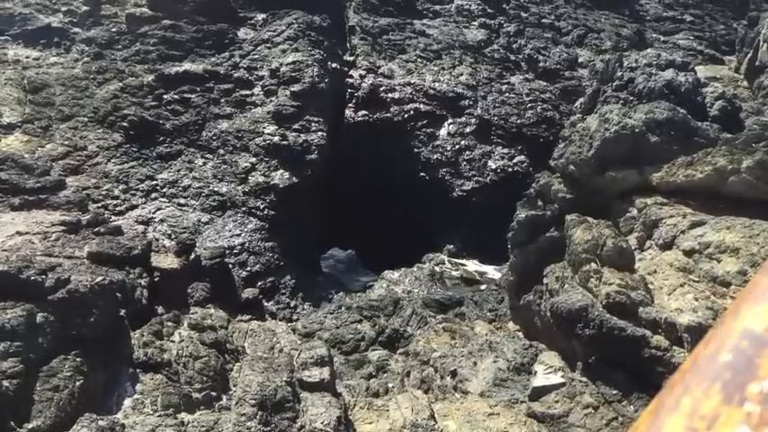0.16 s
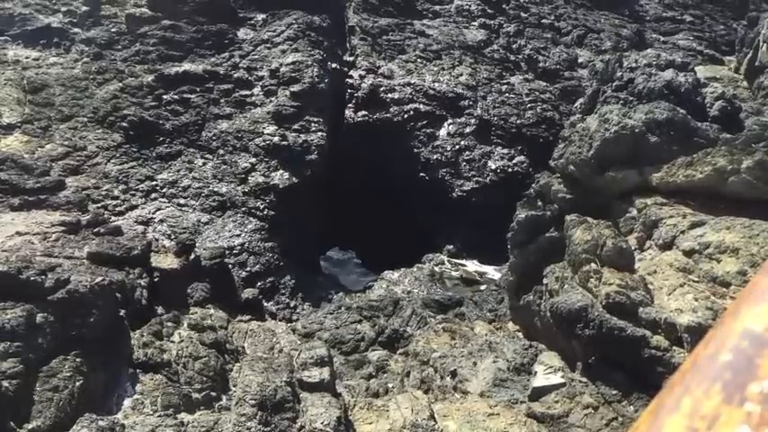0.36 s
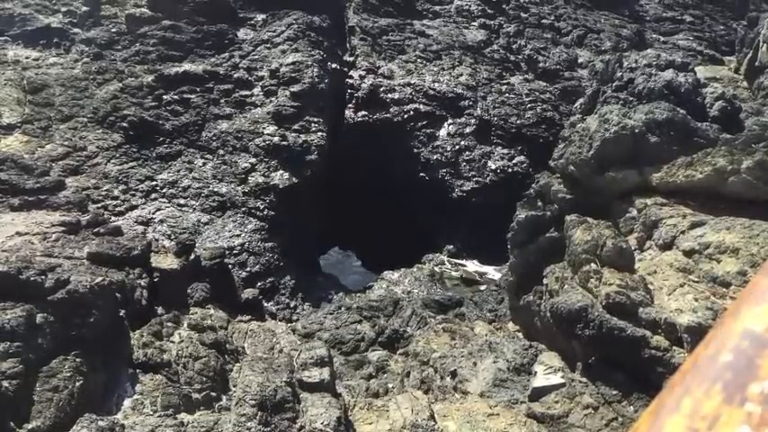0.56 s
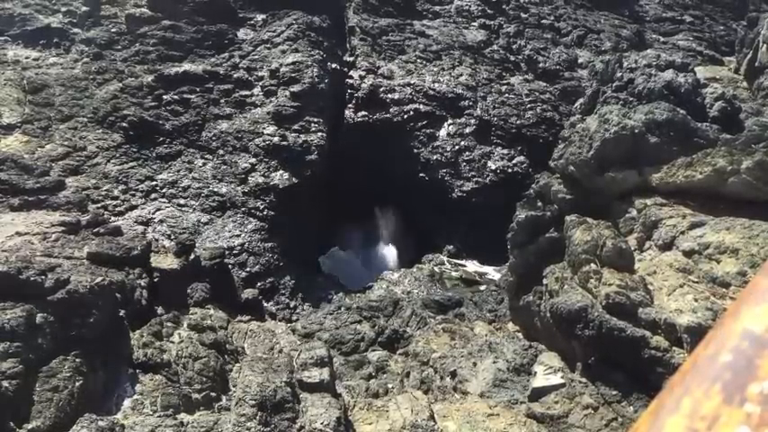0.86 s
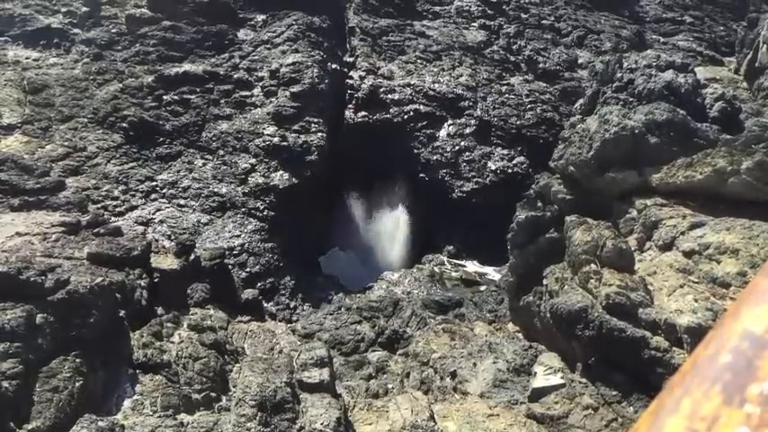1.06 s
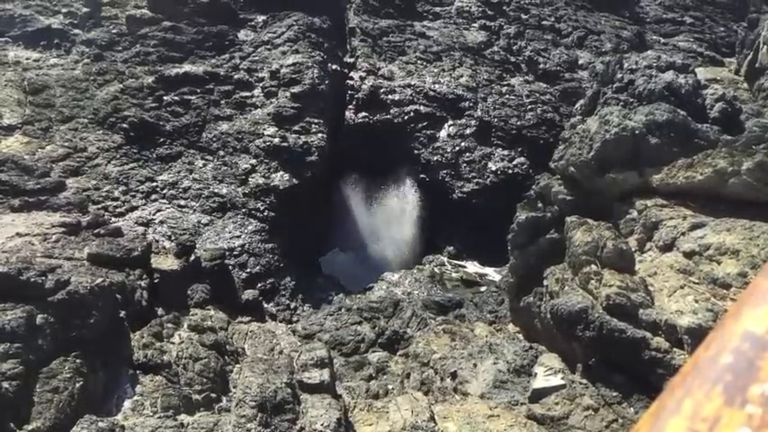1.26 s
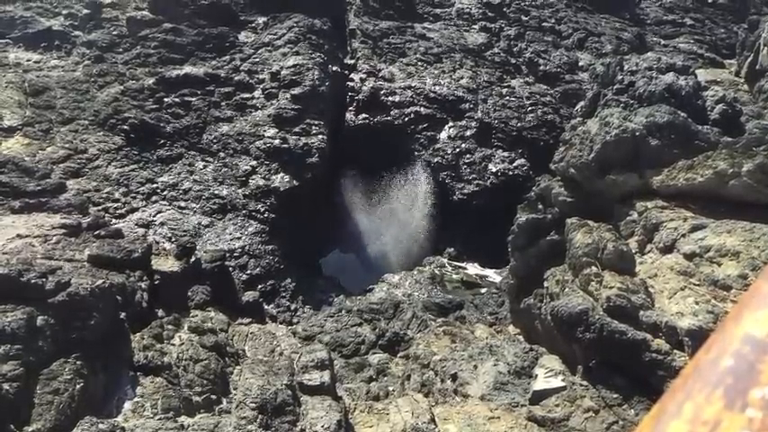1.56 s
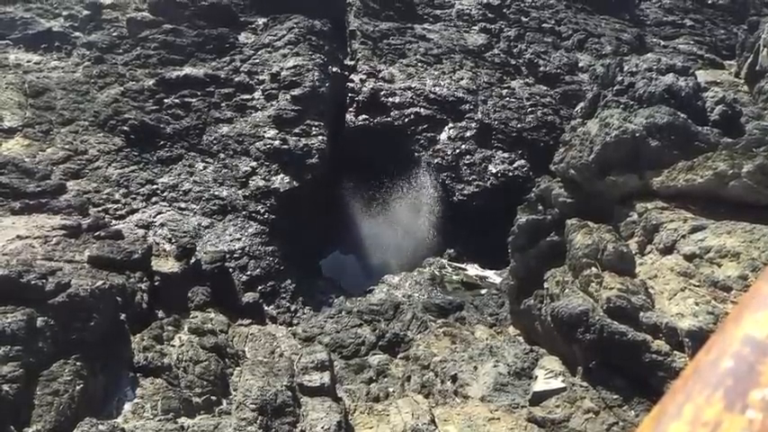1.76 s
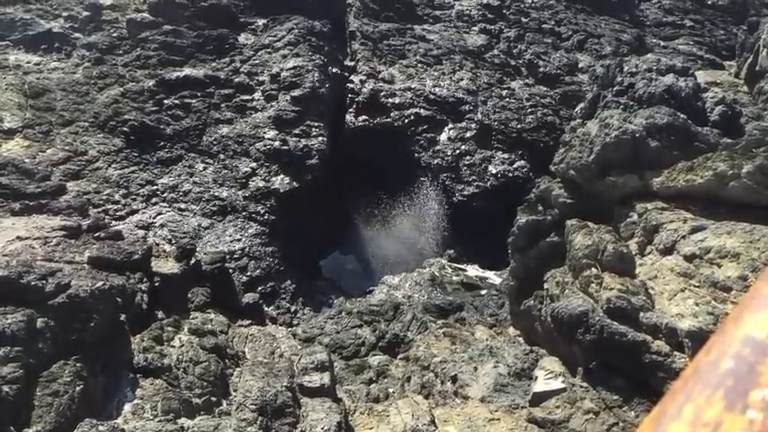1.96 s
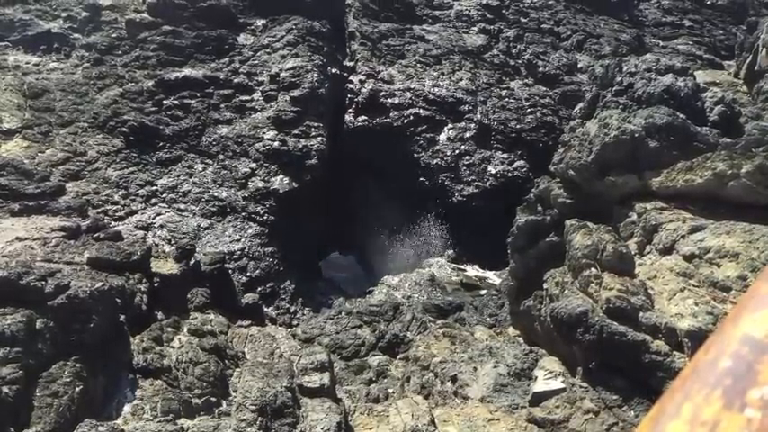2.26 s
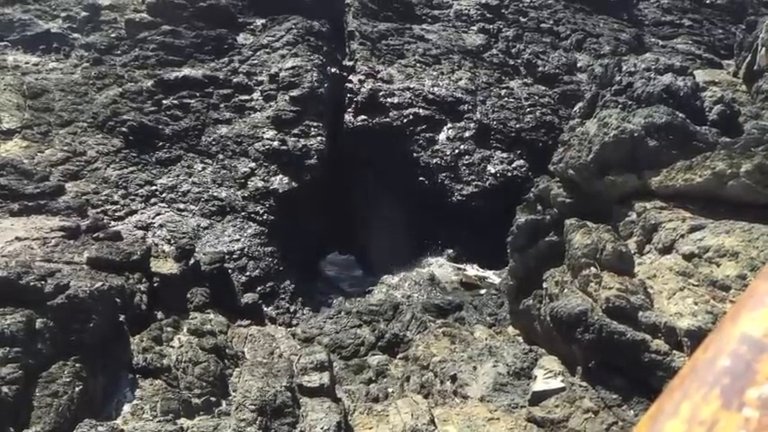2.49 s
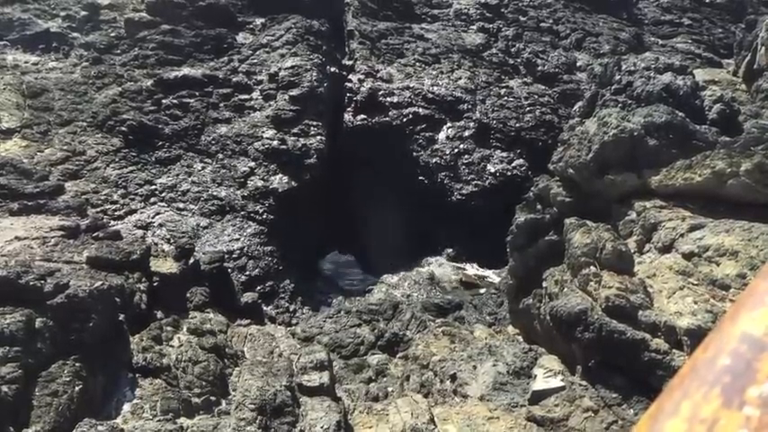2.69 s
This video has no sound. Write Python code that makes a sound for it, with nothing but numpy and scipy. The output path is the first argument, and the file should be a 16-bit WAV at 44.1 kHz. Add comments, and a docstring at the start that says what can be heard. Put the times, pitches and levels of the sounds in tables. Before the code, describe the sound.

A blowhole on a rocky shore: low wind rumble and rapid buffets hit the microphone, strongest in the first 0.4 s, over faint steady surf. Two hollow rushes of water and air peak near 0.3 and 0.6 s, trailing a thin hiss until about 1.1 s. After a lull, spray splatters on rock from 1.4 s, densest at 1.6-2 s, with small plinks and sizzling mist, fading by 2.8 s as wind swells again.

```python
"""A blowhole in a rocky shore. Wind buffets the microphone in short low flutters (banded noise) over
a steady wash of surf (flickering octaves of noise). Two surges of air and water rush through the cavity
with droplets and foam; a thin jet hiss follows. Then the plume's spray patters back on the rock: heavy
drops first, then fine mist (sparse impacts), with droplets plinking into pools (decaying sines)."""
import sys
import numpy as np
from scipy import signal
from scipy.fft import rfft, irfft, next_fast_len
from scipy.io import wavfile
from scipy.ndimage import uniform_filter1d

SR = 44100
rng = np.random.default_rng(int(sys.argv[2]) if len(sys.argv) > 2 else 0)


def master_out(mix):
    """Clip the mix to full scale and print it as 16-bit PCM to the path in sys.argv[1]."""
    frames = np.transpose(np.atleast_2d(mix))
    ceiling = np.clip(frames, -1, 1)
    pcm = np.round(ceiling * 32767).astype(np.int16)
    wavfile.write(sys.argv[1], SR, pcm)


N = 124803

HEAVY_DROPS_PER_S, FINE_DROPS_PER_S = 2800, 12000
DROP_SPREAD_DB = 1
PLINKS_PER_S, PLINK_HZ, PLINK_SPREAD_OCTAVES = 600, 2408, 0.348
PLINK_DECAY_CYCLES, PLINK_SPREAD_DB = 5.6, 1.5
SPLASH_GRAINS_PER_S, SPLASH_DB = 600, -7.5  # droplets thrown by a surge; level against its rush
FOAM_LAG_S, FOAM_RISE_S, FOAM_FALL_S = 0.0067, 0.11, 0.13  # hiss torn from each surge
SURF_DB = -41
FLUTTER_DB = 2  # random unsteadiness of the rumble
BUFFET_ATTACK_S, BUFFET_RELEASE_S, EDGE_STEEPNESS = 0.0016, 0.0055, 4.5
EDDY_SKEW = 0.18  # pressure grows with the square of air speed: crests sharper than troughs
RUMBLE_CUT_HZ, WIND_CEILING_HZ = 39, 746
TOP_HZ = 15350


def undb(db):
    """Decibels to gain."""
    return 10 ** (np.asarray(db) / 20)


def unit(x):
    """Scale to rms 1."""
    return x / np.sqrt(np.mean(x ** 2))


def curve(points):
    """Gain over time from (time [s], level [dB]) points."""
    return undb(np.interp(np.arange(N) / SR, *np.array(points).T))


def bin_hz(size):
    """FFT bin frequencies, at least 1 Hz to keep logs and ratios finite."""
    return np.maximum(np.fft.rfftfreq(size, 1 / SR), 1)


def colour(x, points):
    """Filter by (frequency [Hz], gain [dB]) points joined on a log-frequency axis."""
    hz, db = np.array(points).T
    gain_db = np.interp(np.log(bin_hz(len(x))), np.log(hz), db)
    return irfft(rfft(x) * undb(gain_db), len(x))


def shaped(x, points):
    """A long excitation, coloured, cut to the scene's length, at rms 1."""
    return unit(colour(x, points)[:N])


def noise():
    """White noise of a fast FFT length, at least the scene's."""
    return rng.standard_normal(next_fast_len(N, True))


def walk(rate_hz):
    """Smooth random drift of rms 1: noise under a Gaussian low-pass of width rate_hz."""
    white = noise()
    hz = np.fft.rfftfreq(len(white), 1 / SR)
    return unit(irfft(rfft(white) * np.exp(-(hz / rate_hz) ** 2), len(white)))


def eddies(x, span_s):
    """Even out the strength of a random flutter over span_s, so that one eddy follows the next."""
    size = max(int(span_s * SR), 2)
    power = uniform_filter1d(uniform_filter1d(x ** 2, size), size)
    return x / np.sqrt(power + 1e-12)


def buffet(age_s, length_s, level_db, low_hz, high_hz, spectrum_points):
    """One short puff of turbulence: gated band noise, skewed by the square law of pressure."""
    size = len(age_s)
    hz = bin_hz(size)
    low_edge = 1 + (low_hz / hz) ** 4
    high_edge = 1 + (hz / high_hz) ** (2 * EDGE_STEEPNESS)
    band = 1 / np.sqrt(high_edge * low_edge)
    swirl = colour(irfft(rfft(rng.standard_normal(size)) * band), spectrum_points)
    attack = np.minimum(age_s / BUFFET_ATTACK_S, 1)
    release = np.exp(-np.maximum(age_s - length_s + BUFFET_RELEASE_S, 0) / BUFFET_RELEASE_S)
    gate = attack * release
    air = eddies(swirl, span_s=0.028)
    air = air / np.sqrt(np.average(air ** 2, weights=gate ** 2))
    return undb(level_db) * gate * (air + EDDY_SKEW * (air ** 2 - 1))


def wind(t):
    """Turbulence at the microphone: a low fluttering rumble and buffets, each in its own band."""
    # rumble before the cuts: (time [s], level [dB])
    rumble_levels = [(0, -30), (.2, -24.5), (.33, -31.5), (.5, -28), (.72, -29), (.88, -37), (1.15, -37),
                     (1.3, -31), (1.45, -43), (1.68, -33.5), (1.8, -42.5), (2.15, -29), (2.47, -35),
                     (2.72, -26.5), (2.83, -29.5)]
    # rumble spectrum: (frequency [Hz], gain [dB])
    rumble_colour = [(20, -50), (40, -5), (60, 0.5), (82, 1), (115, -4), (170, -8.5), (260, -15),
                     (450, -33.5), (900, -62)]
    # buffets before the cuts: (start [s], length [s], level [dB], lower edge [Hz], upper edge [Hz])
    buffet_list = [(.004, 0.014, -20, 172, 680), (.02, 0.025, -26.5, 80, 370),
                   (.084, 0.0089, -20, 110, 520), (0.098, 0.0098, -24.5, 290, 720),
                   (.111, 0.014, -15.5, 110, 396), (.124, 0.0183, -24.5, 110, 560),
                   (.14, 0.032, -21.5, 80, 303), (.182, 0.024, -20.5, 55, 480),
                   (.208, 0.012, -15.5, 55, 332), (.233, 0.014, -22, 89, 485),
                   (.248, 0.0097, -19, 130, 720), (.256, 0.012, -14.5, 70, 277),
                   (.281, 0.0096, -13.5, 85, 394), (.35, 0.026, -21.5, 65, 300),
                   (.389, 0.024, -19.5, 80, 417), (.42, 0.033, -24.5, 75, 457), (.493, 0.026, -23, 60, 320),
                   (.598, 0.03, -21, 65, 377), (.635, 0.072, -28.5, 60, 362), (.688, 0.037, -24.5, 52, 202),
                   (.76, 0.034, -28, 70, 268), (.812, 0.018, -25, 55, 523), (1.036, .007, -24, 450, 735),
                   (1.044, 0.029, -29.5, 60, 203), (1.052, .007, -25, 260, 700),
                   (1.199, 0.0092, -20.5, 132, 567), (1.209, 0.041, -29.5, 65, 238),
                   (1.295, 0.022, -24.5, 80, 443), (1.377, 0.017, -25, 75, 367),
                   (1.558, 0.017, -29, 121, 264), (1.64, 0.028, -33, 50, 145),
                   (1.683, 0.012, -23.5, 70, 440), (1.727, 0.031, -28.5, 50, 320),
                   (1.843, 0.052, -33.5, 60, 158), (1.968, 0.031, -28, 55, 396),
                   (2.055, 0.039, -27.5, 48, 196), (2.122, 0.027, -25.5, 48, 226),
                   (2.196, 0.035, -24, 59.5, 280), (2.262, 0.011, -27, 55, 240),
                   (2.33, 0.023, -21.5, 60, 260), (2.372, 0.014, -20.5, 99, 425),
                   (2.418, 0.015, -24.5, 74.5, 218), (2.556, 0.029, -23.5, 75, 382),
                   (2.628, 0.011, -20.5, 100, 403), (2.651, 0.0092, -18, 100, 486),
                   (2.665, 0.023, -18, 90, 248), (2.678, 0.053, -21.5, 111, 557),
                   (2.725, .04, -19, 56, 255), (2.745, 0.069, -34, 140, 564)]
    # spectrum of every buffet: (frequency [Hz], gain [dB])
    buffet_colour = [(20, -29), (40, -21), (70, 4.5), (130, 3), (220, -1.5), (320, -8.5), (420, -10.5),
                     (800, -11.5)]
    rumble = eddies(shaped(noise(), rumble_colour), span_s=0.066)
    out = rumble * curve(rumble_levels) * undb(FLUTTER_DB * walk(17)[:N])
    size = 2 ** 14
    for start_s, length_s, level_db, low_hz, high_hz in buffet_list:
        puff = buffet(t[:size], length_s, level_db, low_hz, high_hz, buffet_colour)
        i = max(int(start_s * SR), 0)
        out[i:i + size] += puff[:N - i]
    # even the fastest eddies stay below the ceiling
    out = signal.sosfilt(signal.butter(10, WIND_CEILING_HZ, fs=SR, output="sos"), out)
    return signal.sosfilt(signal.butter(3, RUMBLE_CUT_HZ, "high", fs=SR, output="sos"), out)


def churn(flicker_db, rate_hz, count=8):
    """Turbulent water: noise in count bands, octaves from the top down, each flickering on its own."""
    white = noise()
    octaves_down = np.minimum(np.log2(SR / 2 / bin_hz(len(white))), count - 1)
    spectrum = rfft(white)
    out = 0
    for k in range(count):
        weight = np.maximum(1 - abs(octaves_down - k), 0)
        band = irfft(spectrum * weight, len(white))
        out = out + band * undb(flicker_db * walk(rate_hz))
    return out


def surf():
    """The steady wash of the sea: coloured turbulence."""
    # surf spectrum: (frequency [Hz], gain [dB])
    surf_colour = [(30, -3), (80, 9), (200, 5), (450, -4), (900, -8), (2000, -4.5), (4000, -12),
                   (8000, -18), (11000, -24.5), (15000, -25)]
    return undb(SURF_DB) * shaped(churn(flicker_db=1.0, rate_hz=16), surf_colour)


def drops(per_s, clump_db):
    """Tiny impacts at random times, of uneven size, whose strength drifts together by clump_db."""
    white = noise()
    hit = rng.random(len(white)) < per_s / SR
    size_db = DROP_SPREAD_DB * np.minimum(rng.exponential(size=len(white)), 4)
    return np.sign(white) * hit * undb(size_db + clump_db * walk(17))


def plinks(per_s):
    """Droplets striking water: each rings for a few cycles at its own pitch; rms 1 overall."""
    out, age_s = np.zeros(N), np.arange(SR // 40) / SR
    for when, size, pitch in rng.random((int(per_s * N / SR), 3)):
        octaves = PLINK_SPREAD_OCTAVES * np.log(pitch / (1 - pitch)) / 2  # logistic spread
        hz = PLINK_HZ * 2 ** np.clip(octaves, -2, 2)
        ring = np.sin(2 * np.pi * hz * age_s) * np.exp(-hz * age_s / PLINK_DECAY_CYCLES)
        gain = undb(PLINK_SPREAD_DB * min(-np.log(size), 4))
        i = int(when * N)
        out[i:i + len(age_s)] += (gain * ring)[:N - i]
    return unit(out)


def swell(t, peak_s, level_db, rise_s, fall_s):
    """Exponential rise to a peak, then exponential fall."""
    return undb(level_db) * np.exp(np.minimum((t - peak_s) / rise_s, (peak_s - t) / fall_s))


def surges(t):
    """Each surge swells and dies in the cavity, throws droplets and tears off a hiss of foam."""
    # surges: (peak [s], rush level before splash [dB], rise [s], fall [s], foam level [dB])
    surge_list = [(0.327, -33, 0.093, 0.19, -41.5), (0.579, -31, 0.047, 0.1, -42.5)]
    # rush spectrum: (frequency [Hz], gain [dB])
    surge_colour = [(100, 0.5), (300, -0.5), (700, 3.5), (1100, -1), (2000, -9.5), (3200, -12.5),
                    (4500, -16), (8000, -25), (15000, -42)]
    # foam spectrum: (frequency [Hz], gain [dB])
    foam_colour = [(1000, -22), (3000, 7.5), (6000, 10), (10000, 2.5), (15000, 0.5)]
    flow_power, froth_power = 0, 0
    for peak_s, rush_db, rise_s, fall_s, foam_db in surge_list:
        flow_power = flow_power + swell(t, peak_s, rush_db, rise_s, fall_s) ** 2
        froth = swell(t, peak_s + FOAM_LAG_S, foam_db, FOAM_RISE_S, FOAM_FALL_S)
        froth_power = froth_power + froth ** 2
    rush = shaped(churn(flicker_db=1.0, rate_hz=35), surge_colour)
    splash = undb(SPLASH_DB) * plinks(SPLASH_GRAINS_PER_S)
    foam = shaped(drops(FINE_DROPS_PER_S, clump_db=0.4), foam_colour)
    return (rush + splash) * np.sqrt(flow_power) + foam * np.sqrt(froth_power)


def plume():
    """The jet hisses out; heavy drops splatter on rock and plink into pools; fine mist sizzles down."""
    # jet leaving the hole: (time [s], level [dB])
    jet_levels = [(.5, -73), (.63, -44), (.8, -50.5), (.93, -51), (1.08, -59), (1.3, -84)]
    # jet spectrum: (frequency [Hz], gain [dB])
    jet_colour = [(1500, -11), (4000, -0.5), (7000, 4), (10000, -1), (15000, -4)]
    # heavy spray landing on the rock: (time [s], level [dB])
    spray_levels = [(1.2, -44), (1.4, -42), (1.52, -37), (1.63, -35.5), (1.8, -36), (1.94, -38),
                    (2.15, -38.5), (2.45, -42.5), (2.62, -45.5), (2.83, -51)]
    # spray spectrum: (frequency [Hz], gain [dB])
    spray_colour = [(150, 1.5), (400, -6), (850, 4.5), (1400, -.5), (2000, 0.5), (4000, -5.5), (8000, -15),
                    (15000, -29)]
    # droplets into rock pools: (time [s], level [dB])
    plink_levels = [(1.45, -65), (1.62, -40), (1.8, -43.5), (1.94, -39.5), (2.12, -45.5), (2.35, -48.5),
                    (2.62, -49), (2.83, -61)]
    # fine mist settling: (time [s], level [dB])
    mist_levels = [(1.38, -68), (1.62, -41), (1.8, -41.5), (1.95, -39.5), (2.35, -40), (2.67, -39),
                   (2.75, -47), (2.83, -50)]
    # mist spectrum: (frequency [Hz], gain [dB])
    mist_colour = [(800, -18), (2500, 3), (6000, 2), (9000, -4), (12000, -8.5), (15000, -8.5)]
    jet = shaped(drops(FINE_DROPS_PER_S, clump_db=-0.5), jet_colour) * curve(jet_levels)
    heavy = shaped(drops(HEAVY_DROPS_PER_S, clump_db=0.64), spray_colour) * curve(spray_levels)
    pools = plinks(PLINKS_PER_S) * curve(plink_levels)
    mist = shaped(drops(FINE_DROPS_PER_S, clump_db=0.4), mist_colour) * curve(mist_levels)
    return jet + heavy + pools + mist


def scene():
    """Wind, surf and blowhole at one microphone."""
    t = np.arange(N) / SR
    return (wind(t) + surf() + surges(t) + plume())[None]


def record(dry):
    """The microphone colours the sound and loses the highest treble."""
    # broad peaks and notches: (frequency [Hz], gain [dB])
    pickup_colour = [(1400, -1.5), (1650, -1), (1950, 2), (2250, 1), (2500, -3), (2900, -1.5), (3250, -6),
                     (3900, -3), (4500, -6.5), (4950, -11), (5500, -4.5), (6600, -2.5), (7600, -5.5),
                     (9200, -2.5), (10000, -4), (10500, -7.5), (11000, -3.5)]
    padding = next_fast_len(N + SR // 10, True) - N
    heard = colour(np.pad(dry[0], (0, padding)), pickup_colour)[:N]
    low_pass = signal.ellip(12, 0.1, 90, TOP_HZ, fs=SR, output="sos")
    return signal.sosfilt(low_pass, heard)[None]


dry = scene()
out = record(dry)
master_out(out)
```